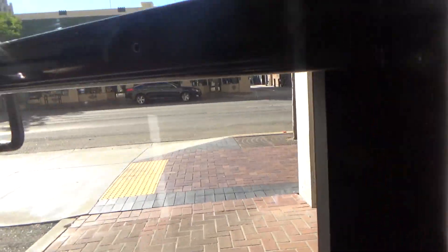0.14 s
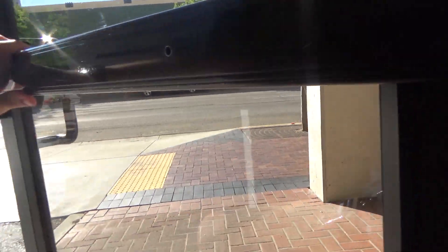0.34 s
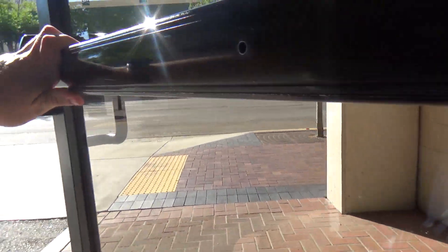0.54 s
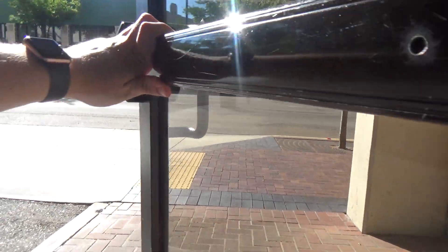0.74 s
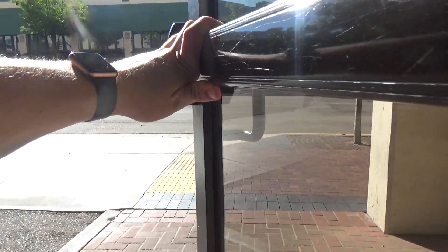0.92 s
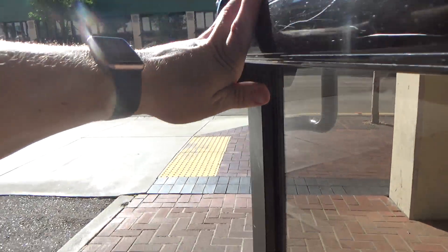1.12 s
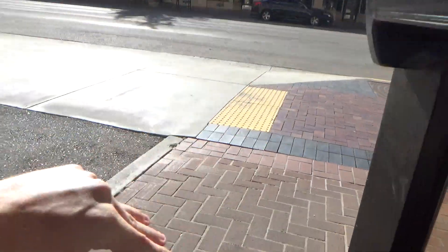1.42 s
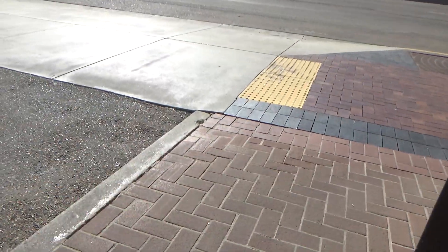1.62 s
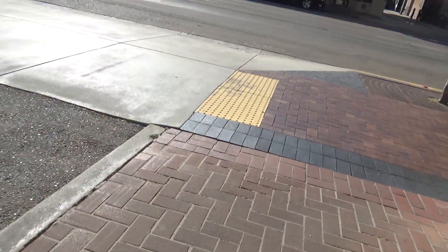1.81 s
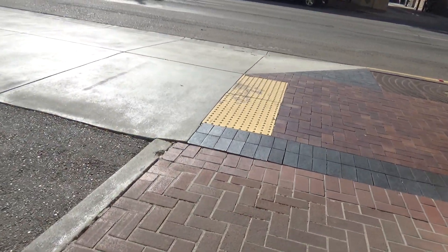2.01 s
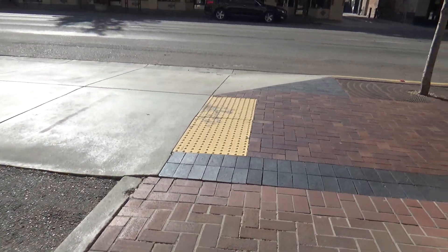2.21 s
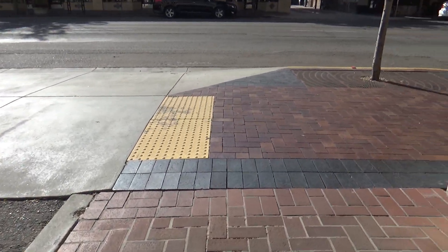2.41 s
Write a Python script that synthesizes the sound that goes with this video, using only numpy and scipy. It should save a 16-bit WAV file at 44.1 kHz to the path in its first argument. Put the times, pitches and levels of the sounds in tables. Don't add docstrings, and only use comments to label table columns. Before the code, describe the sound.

A glass entry door is pushed open with sharp metal clicks, scrapes and a heavy clunk.

```python
import sys
import numpy as np
from scipy import signal
from scipy.fft import rfft, irfft, next_fast_len
from scipy.io import wavfile
from scipy.ndimage import uniform_filter1d

SR = 44100
rng = np.random.default_rng(int(sys.argv[2]) if len(sys.argv) > 2 else 0)


def makeup_ratio(level_db):
    decades = np.asarray(level_db, float) / 20
    return 10 ** decades


def persist_wave(psi):
    counts = np.round(np.clip(psi, -1, 1) * 32767).astype(np.int16)
    wavfile.write(sys.argv[1], SR, np.atleast_2d(counts).T)


N = 112454


def evened(x):
    return x / np.sqrt(np.mean(x ** 2) + 1e-20)


def peaked(x, db):
    return x * makeup_ratio(db) / np.sqrt(np.mean(x[:400] ** 2))


def read(points, hz):
    f, value = np.transpose(points)
    return np.interp(np.log(hz + 1), np.log(f + 1), value)


def colour(x, gain):
    size = next_fast_len(x.shape[-1] + 2048)
    spectrum = rfft(x, size) * gain(np.fft.rfftfreq(size, 1 / SR))
    return irfft(spectrum, size)[..., :x.shape[-1]]


def low_pass(f, corner_hz):
    return 1 / (1 + (f / corner_hz) ** 4)


def high_pass(f, corner_hz):
    return 1 / (1 + (corner_hz / (f + 1)) ** 4)


def decay(t, t60):
    return makeup_ratio(-60 * t / max(t60, .01))


def rise(t, seconds):
    return np.minimum(t / seconds, 1)


def add(mix, s, sound):
    part = mix[round(s * SR):][:len(sound)]
    part += sound[:len(part)]


def resonate(x, hz, width):
    turn = np.exp(2j * np.pi * np.cumsum(hz * np.ones(len(x))) / SR)
    r = np.exp(-np.pi * width / SR)
    return 2 * (turn * signal.lfilter([1 - r], [1, -r], x / turn)).real


def slips(per_s, spread_db):
    size = makeup_ratio(spread_db * np.minimum(rng.exponential(1, N), 4)) * rng.choice([-1., 1.], N)
    return size * (rng.random(N) < per_s / SR)


# f/Hz, level/dB
STREET_TONE = [(12, -52), (20, -28.5), (210, 3.5), (660, 0), (1090, 1.5), (1440, -5), (1810, -3),
               (9140, -21), (16000, -37)]
# f/Hz, coherence/1
STREET_COHERENCE = [(200, 1), (1500, 0.85), (9000, .8), (11000, 0.88)]


def street():
    frames, hz = N // 256 + 5, np.fft.rfftfreq(1024, 1 / SR)
    a, b, c, d, patches = rng.standard_normal((frames, 513, 5)).T
    patches = evened(uniform_filter1d(uniform_filter1d(patches, 12, 0), 10, 1))
    same = np.clip(read(STREET_COHERENCE, hz), -1, 1)[:, None]
    left, other = a + 1j * b, c + 1j * d
    z = np.array([left, same * left + np.sqrt(1 - same ** 2) * other])
    z *= makeup_ratio(read(STREET_TONE, hz)[:, None] + 3.2 * patches)
    wash = signal.istft(z, nperseg=1024, noverlap=768)[1][:, :N]
    return makeup_ratio(-38) * evened(wash)


TICK_RISE_S = 0.0017

# t/s, peak level/dB, ring f/Hz, t60/s
PINGS = [
    (1.099, -31, 9950, 0.077),
    (1.8267, -26, 13200, 0.027),
    (2.0907, -28.5, 5770, 0.035),
    (2.251, -34.5, 9400, 0.065),
    (2.328, -38, 8960, 0.036),
]


def pings():
    out, t = np.zeros(N), np.arange(4000) / SR
    for (s, db, hz, t60), noise in zip(PINGS, rng.standard_normal((len(PINGS), len(t)))):
        ring = resonate(resonate(noise, hz, 700), hz, 700)
        ring = ring * decay(t, t60) * rise(t, TICK_RISE_S)
        add(out, s - .001, peaked(ring, db))
    return out


# t/s, length/s, start f/Hz, end f/Hz, level/dB
SINGS = [(0.568, .045, 2300, 2600, -37), (0.598, .07, 270, 215, -33), (1.333, .033, 7200, 11600, -26),
         (1.35, .04, 780, 840, -20), (1.365, .045, 1060, 1030, -23), (1.395, .07, 505, 495, -26),
         (1.705, .045, 640, 580, -22), (1.725, .065, 430, 415, -25), (1.755, .04, 9560, 9600, -28),
         (1.76, .06, 1100, 1100, -23), (1.775, .05, 330, 312, -20), (1.85, .025, 9150, 9100, -28),
         (1.855, .035, 330, 330, -27), (1.9, .033, 5400, 5460, -30), (1.905, .04, 335, 335, -28),
         (2.0, .14, 228, 220, -23), (2.0, .065, 615, 640, -26), (2.27, .06, 420, 400, -30)]


def squeak():
    out = np.zeros(N)
    for (start, length, from_hz, to_hz, db), noise in zip(SINGS, rng.standard_normal((len(SINGS), 9000))):
        t = np.arange(0, length, 1 / SR)
        hz = from_hz + (to_hz - from_hz) * np.minimum(1.12 * t / length, 1)
        clean = np.sin(2 * np.pi * np.cumsum(hz) / SR)
        rough = resonate(noise[:len(t)], hz, min(.08 * from_hz, 300))
        share = max(.35, min(from_hz / 5000, 1))
        note = (1 - share) * evened(clean) + share * evened(rough)
        add(out, start, makeup_ratio(db) * np.sin(np.pi * t / length) * note)
    return out


# f/Hz, level/dB
RUB_TONE = [(35, -63), (60, -32), (217, 17.5), (822, -16), (1060, 0), (1510, -13.5), (1780, -9),
            (9790, -27), (16000, -43.5)]


def rattle():
    hits, which = slips(2500, 2.0), rng.integers(0, 40, N)
    t, out = np.arange(3000) / SR, np.zeros(N)
    modes_hz = np.geomspace(1500, 12500, 40) * rng.uniform(0.94, 1.03, 40)
    for k, hz in enumerate(modes_hz):
        envelope = makeup_ratio(read(RUB_TONE, hz) - 60 * t / .022) * rise(t, 0.00093)
        ring = envelope * np.sin(2 * np.pi * hz * t) * np.sqrt(hz)
        out += signal.oaconvolve(hits * (which == k), ring)[:N]
    return out


def lumps():
    size = round(0.014 * SR)
    wander = uniform_filter1d(uniform_filter1d(rng.standard_normal(N), size), size)
    return makeup_ratio(3 * evened(wander))


# frame f/Hz, then rows of t/s, effort level/dB, weight on frame level/dB, hiss level/dB
SCRAPES = [
    (500, [(0, -38, -2, 0.5), (.1, -53.5, 2, -10), (.125, -34, -8, -7), (.165, -38.5, -7, -2), (.2, -38, -6.5, -9), (.33, -54, 7, -12)]),
    (400, [(.67, -62, 0, 11.5), (.74, -61, -3, 14), (.78, -59, 3, 8)]),
    (850, [(1.07, -33, 4.5, 0.5), (1.22, -55, 3.5, 7.5), (1.325, -40.5, 8.5, 0.5), (1.35, -35.5, 3.5, 9), (1.365, -14.5, 1, -1.5), (1.38, -17.5, -2, -5), (1.393, -21.5, 0, 2), (1.45, -27, -2, -3), (1.62, -44.5, -8, -41)]),
    (330, [(1.688, -22, -10, -5), (1.725, -13, -0.5, -5), (1.75, -17.5, 2, -4), (1.77, -21, 2, 5.5), (1.81, -22, 4.5, -4.5), (1.835, -19, -8, -6), (1.845, -27, -5, 1), (1.93, -25.5, -1, -21), (1.998, -38.5, -6, -19)]),
    (535, [(2.0, -18.5, -2.5, -14), (2.03, -25, 0.5, 4), (2.07, -30, 1.5, 2.5), (2.095, -25.5, 3, -4), (2.115, -31.5, 3.5, 1), (2.14, -34, 8, 3.5), (2.205, -47, -3, -17)]),
    (515, [(2.21, -29, -3, -8), (2.26, -33, 7, -11), (2.3, -41, 1, -2), (2.39, -42.5, 6.5, -8), (2.42, -42.5, 8.5, -8), (2.55, -46, 7, -11)]),
]


def scrapes():
    t = np.arange(N) / SR
    grit, drive = slips(9000, 4.5), slips(900, 0) * lumps()
    surface = evened(colour(grit, lambda f: makeup_ratio(read(RUB_TONE, f)))) + makeup_ratio(-16) * evened(rattle())
    mid = evened(colour(surface * lumps(), lambda f: high_pass(f, 1400) * low_pass(f, 6000)))
    top = evened(colour(surface * lumps(), lambda f: high_pass(f, 6000)))
    out = np.zeros(N)
    for hz, rows in SCRAPES:
        s, db, low_db, high_db = np.transpose(rows)
        gate = np.clip(np.minimum((t - s[0]) / 0.0027, (s[-1] - t) / 0.0035 + 1), 0, 1)
        broad = colour(drive, lambda f: high_pass(f, .5 * hz) * low_pass(f, 1300))
        frame = evened(resonate(broad, hz, 97))
        low = evened(evened(broad) + makeup_ratio(-27) * frame)
        for offset_db, layer in [(0, mid), (low_db, low), (high_db, top)]:
            out += gate * makeup_ratio(np.interp(t, s, db + offset_db)) * layer
    return out


# t/s, peak level/dB, body f/Hz, t60/s
KNOCKS = [(0.085, -27, 790, 0.023), (0.119, -30, 546, 0.12), (0.5605, -22, 466, 0.1),
          (0.612, -31, 142, 0.11), (0.723, -37, 1300, 0.04), (1.335, -24.5, 530, 0.032),
          (1.268, -28, 680, 0.021), (1.295, -21.5, 486, 0.046), (1.359, -18.5, 860, 0.045),
          (1.423, -14.5, 960, 0.048), (2.077, -14.5, 1252, 0.09), (2.118, -9.5, 1122, 0.11),
          (2.235, -17, 664, 0.063), (2.396, -22.5, 1480, 0.065)]
# t/s, peak level/dB, body f/Hz, t60/s
CLACKS = [(0.122, -37, 1960, 0.05), (0.181, -29.5, 2260, 0.024), (0.237, -32, 2000, 0.042),
          (0.634, -28, 2300, 0.055), (0.727, -37, 2220, 0.024), (1.729, -13, 2530, 0.037),
          (0.572, -26.5, 2340, 0.091), (0.6542, -27, 1860, 0.095), (1.3884, -13.5, 3470, 0.19),
          (1.6924, -7, 3160, 0.11), (2.0021, -16.5, 2330, 0.027), (2.207, -20, 1320, 0.078)]
# t/s, peak level/dB, body f/Hz, t60/s
THUDS = [
    (1.693, -26, 121, 0.18),
    (1.8, -21, 94, 0.16),
]


def knocks():
    out, t = np.zeros(N), np.arange(9000) / SR
    blows = KNOCKS + CLACKS + THUDS
    for (s, db, hz, t60), (a, b) in zip(blows, rng.standard_normal((len(blows), 2, len(t)))):
        t60 = max(t60, .01)
        blow = a * t * np.exp(-t / 0.0011)
        body = peaked(resonate(blow, hz, 2.9 / t60 + 0.018 * hz), 0)
        body = body + peaked(resonate(blow, 2.0 * hz, 5 / t60), -14.5)
        body = colour(body, lambda f: 1 / (1 + (f / (3 * hz)) ** 2))
        puff = evened(colour(b, lambda f: f / (f + 0.26 * hz) * low_pass(f, 1.26 * hz + 1500)))
        puff = puff * decay(t, t60) * rise(t, 0.0015)
        add(out, s, peaked(body + makeup_ratio(2) * puff, db - 2))
    return out


# t/s, peak level/dB, ring f/Hz, t60/s
TICKS = [(0.0367, -28, 9200, 0.02), (0.2665, -31, 8200, 0.04), (0.3321, -36, 4900, 0.034),
         (0.6236, -33, 10000, 0.042), (1.496, -11, 8250, 0.035), (1.983, -29, 10900, 0.04),
         (2.0032, -14, 6230, 0.15), (2.2365, -22.5, 8040, 0.017), (2.399, -27, 7500, 0.03),
         (2.5076, -32, 5150, 0.033), (0.087, -21.5, 4000, 0.033), (0.154, -20.5, 5000, 0.035),
         (0.2313, -26, 9000, 0.055), (0.3714, -4.5, 8580, 0.18), (0.493, -27, 6240, 0.034),
         (0.542, -23.5, 10000, 0.052), (0.7693, -39, 6700, 0.026), (0.8276, -12, 8460, 0.067),
         (0.966, -30, 6800, 0.055), (1.0556, -3, 8620, 0.073), (1.216, -7.5, 7460, 0.026),
         (1.2846, -15.5, 10600, 0.12), (1.3038, -13, 10200, 0.042), (1.333, -7, 7700, 0.18),
         (1.4902, -7, 8480, 0.047), (1.6895, -5.5, 4860, 0.086), (1.708, 0, 8520, 0.064),
         (1.8433, -1, 9550, 0.034), (1.863, -8, 9400, 0.024), (1.901, -6, 4180, 0.069),
         (1.9344, -17, 10400, 0.041), (2.2077, -17.5, 5160, 0.049), (2.2515, -20.5, 4530, 0.048)]
# f/Hz, level/dB, t60/s
BRACKET = [
    (8436, -2, .18),
]
# f/Hz, level/dB
TICK_TONE = [(180, -55), (300, -16), (885, -3.5), (1530, -12.5), (2880, 2.5), (3950, -2), (8640, 5.5),
             (13300, -3.5), (16000, -26)]


def ticks():
    out, t = np.zeros(N), np.arange(9000) / SR
    width_hz = 450
    for (s, db, hz, t60), (a, b) in zip(TICKS, rng.standard_normal((len(TICKS), 2, len(t)))):
        fade = decay(t, t60) * rise(t, TICK_RISE_S)
        chatter = a * np.exp(-t / 0.0029) * rise(t, 0.00055)
        shimmer = evened(colour(b, lambda f: makeup_ratio(read(TICK_TONE, f)))) * fade
        own = evened(resonate(resonate(a, hz, width_hz), hz, width_hz)) * fade
        rings = np.zeros(len(t))
        for f, ring_db, ring_t60 in BRACKET:
            ring = resonate(chatter, f, np.log(1000) / np.pi / ring_t60)
            rings += makeup_ratio(ring_db) * ring * np.sqrt(ring_t60)
        rings *= min(hz / 8000, 1) ** 4
        add(out, s - .001, peaked(shimmer + makeup_ratio(-4.5) * own + makeup_ratio(27) * rings, db - 11.5))
    return out


# f/Hz, t60/s
ENTRANCE_T60 = [(200, 0.47), (2000, 0.41), (12000, 0.35)]
# f/Hz, level/dB
WET_TONE = [(200, -1), (2500, -6.5), (12000, -9.5)]
# f/Hz, coherence/1
WET_COHERENCE = [(200, 0.94), (2000, 0.21), (9500, 0.35), (11000, 0.95)]


def entrance(x):
    taps = np.zeros((2, SR // 2))
    at = np.arange(200, SR // 2 - 20, 20)
    shape = (2, len(at))
    np.put_along_axis(taps, at + rng.integers(0, 20, shape), rng.choice([-1., 1.], shape), 1)
    hz, t, z = signal.stft(taps, SR, nperseg=256)
    same = np.clip(read(WET_COHERENCE, hz), 0, 1)[:, None]
    fall_db = -60 * t / read(ENTRANCE_T60, hz)[:, None]
    z = np.array([z[0], same * z[0] + np.sqrt(1 - same ** 2) * z[1]]) * makeup_ratio(fall_db)
    energy = np.sum(makeup_ratio(2 * fall_db), 1)[:, None]
    z *= makeup_ratio(read(WET_TONE, hz))[:, None] / np.sqrt(energy)
    tail = signal.istft(z, SR, nperseg=256)[1] * np.sqrt(20 / 128)
    return signal.fftconvolve(x[None], tail, axes=1)[:, :N]


def scene():
    door = ticks() + knocks() + scrapes() + squeak() + pings()
    door = colour(door, lambda f: high_pass(f, 92))
    return door + entrance(door) + street()


# f/Hz, level/dB
LEAN = [(100, 1), (1000, -4), (4000, -5.5), (10000, 0)]
# f/Hz, phase/rad
LEAD = [(60, -.2), (600, -.7), (2500, -.5), (9000, -.4), (11000, -.08)]


def port_pair(x):
    side = np.array([[.5], [-.5]])
    shut = colour(x, lambda f: np.exp(1j * side * read(LEAD, f)))
    leaning = colour(shut, lambda f: makeup_ratio(side * read(LEAN, f)))
    opened = np.linspace(0.05, 1, N)
    return (1 - opened) * shut + opened * leaning


def limiter(ports):
    threshold_db, share, recover_db_per_s = -16, 0.55, 43
    power_db = 10 * np.log10(abs(uniform_filter1d((ports ** 2).mean(0), 200)) + 1e-12)
    fall = np.arange(N) * recover_db_per_s / SR
    held_db = np.maximum.accumulate(power_db + fall) - fall
    over_db = np.maximum(held_db - threshold_db, 0)
    limited = ports / makeup_ratio(share * uniform_filter1d(over_db, 100))
    return 0.65 * np.tanh(limited / 0.73)


def top_cut(x):
    return signal.sosfilt(signal.butter(12, 16500, fs=SR, output="sos"), x)


def record(dry):
    limited = limiter(port_pair(dry))
    banded = colour(limited, lambda f: 1 / (1 + (f / 15850) ** 120))
    return top_cut(banded)


dry = scene()
out = record(dry)
persist_wave(out)
```